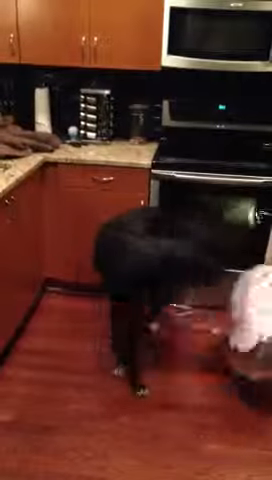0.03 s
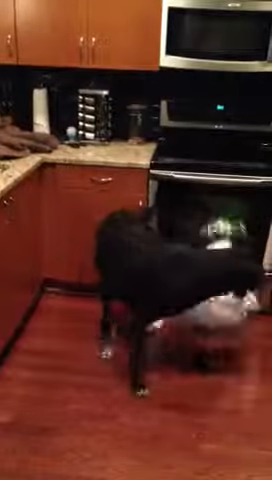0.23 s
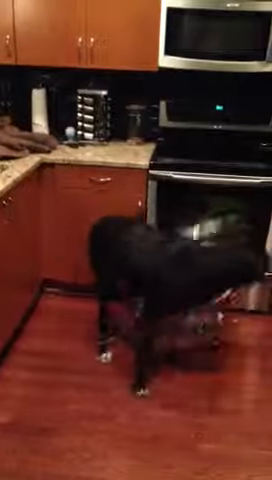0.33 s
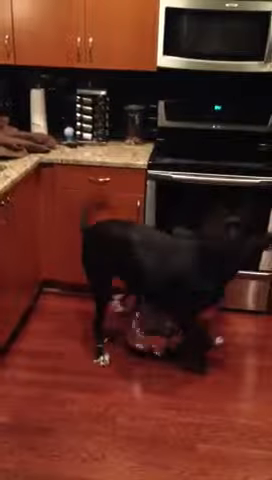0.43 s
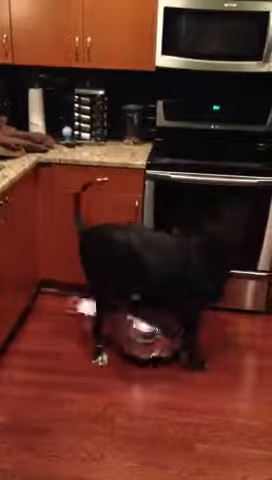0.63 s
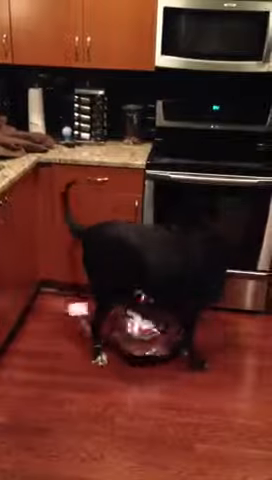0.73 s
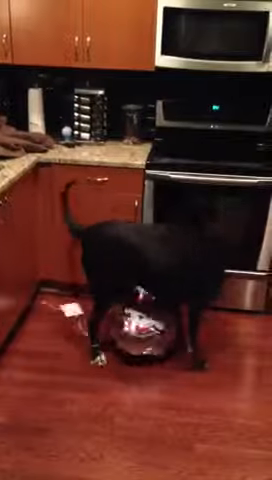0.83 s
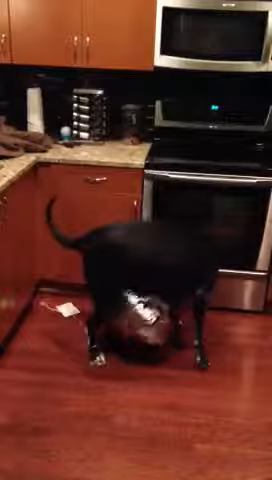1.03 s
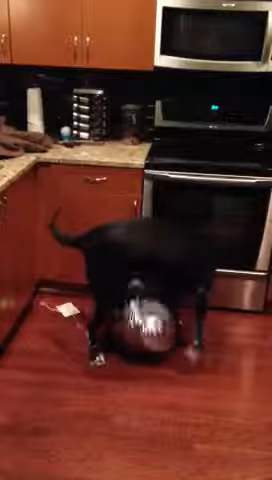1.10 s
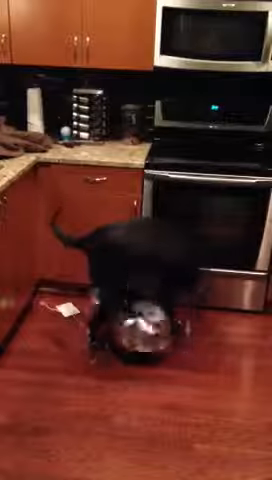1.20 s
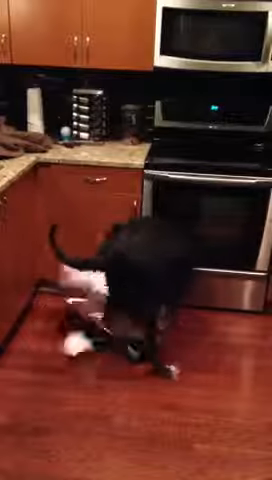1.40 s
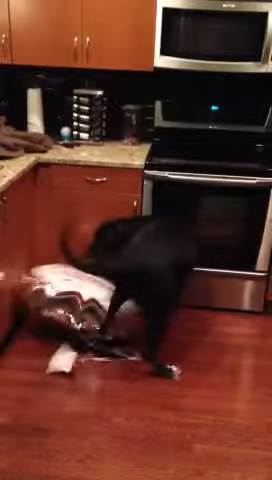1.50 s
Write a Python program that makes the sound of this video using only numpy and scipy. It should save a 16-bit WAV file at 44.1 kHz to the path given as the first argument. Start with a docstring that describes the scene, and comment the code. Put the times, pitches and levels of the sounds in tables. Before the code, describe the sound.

Foil balloon crackling and thumping as a dog pounces on it, paws thudding on wood.

```python
"""Foil crackle and hollow thumps: a large dog pounces on an inflated foil balloon on a wooden kitchen floor.
Each shove buckles the foil in a burst of tiny snaps that also drum on the gas inside.
Paws thud, claws tick, and something small and hard, probably the weight on the ribbon, knocks twice.
A few brief squeaks come in between; the bare room rings on over a steady hush."""
import sys
import numpy as np
from scipy import signal
from scipy.fft import rfft, irfft
from scipy.io import wavfile
from scipy.ndimage import uniform_filter1d

SR = 44100
rng = np.random.default_rng(int(sys.argv[2]) if len(sys.argv) > 2 else 0)


def digitize_waveform(pressure):
    """Quantize a signal to 16-bit integers and store it at the path in sys.argv[1].

    Rows of a 2-D input are taken as channels; values are limited to [-1, 1].
    """
    field = np.atleast_2d(pressure).T
    bounded = np.clip(field, -1, 1)
    quanta = np.round(bounded * 32767).astype(np.int16)
    wavfile.write(sys.argv[1], SR, quanta)


N = 68355
T = np.arange(N) / SR
AGE = T[:SR // 2]   # time since an onset [s]


def balloon():
    """Buckling foil rustles, crackles and drums on the hollow gas and the papery skin."""
    # (time [s], rise [s], t60 [s], gas [dB], skin [dB], rustle [dB], crackle [dB])
    shoves = [(0.0, 0.0079, 0.32, -62.5, -58, -53.5, -49.5),
              (0.062, 0.0041, 0.0729, -60.5, -60, -49.5, -44),
              (0.135, 0.0087, 0.48, -48.5, -51.5, -47.5, -50), (0.154, .015, 0.49, -41, -43, -47, -53),
              (0.226, 0.003, 0.19, -34, -38, -43.5, -51.5),
              (0.238, 0.00483, 0.2047, -26.5, -29, -26.5, -44.5),
              (0.28, 0.0304, 0.4736, -28.5, -34, -32, -38), (0.343, 0.006, 0.3063, -25, -26.5, -25.5, -31),
              (0.407, 0.00417, 0.1043, -20.5, -28, -28.5, -34.5),
              (0.515, 0.0043, 0.2964, -47, -45, -45, -47.5), (0.705, .004, 0.214, -45.5, -47.5, -49, -48.5),
              (0.718, 0.0185, 0.19, -38, -40, -42, -46), (0.759, 0.0117, 0.2126, -34, -40.5, -38, -39.5),
              (0.823, 0.0045, 0.2352, -56, -51, -43, -45.5), (0.925, 0.015, 0.15, -63.5, -60, -52.5, -51),
              (0.962, 0.0124, 0.3272, -47, -49, -47.5, -53), (1.032, 0.011, 0.0827, -45, -53.5, -57, -62),
              (1.082, 0.0039, 0.0044, -45.5, -49.5, -59, -71.5),
              (1.143, 0.0067, 0.6, -51.5, -57.5, -55.5, -51.5),
              (1.235, 0.0123, 0.2238, -41, -49.5, -54, -64.5),
              (1.286, 0.0159, 0.1655, -34.5, -45.5, -41.5, -36),
              (1.317, 0.00645, 0.1379, -29, -38.5, -29, -40.5),
              (1.33, 0.00453, 0.1308, -32, -40.5, -32.5, -33.5),
              (1.412, 0.0143, 0.3257, -42, -45, -44.5, -47), (1.474, 0.0165, 0.25, -43, -46, -43, -47)]
    # snap spectra: (frequency [Hz], level [dB])
    rustle_spectrum = [(100, -26), (300, -10.5), (700, -3), (1100, 2), (1500, 1.5), (2200, -0.5),
                       (3500, -5), (6000, -14.5), (10000, -26.5), (16000, -32)]
    crackle_spectrum = [(500, -24.5), (2000, -4.5), (4000, 4), (7000, -2.5), (10000, -7), (15000, -10.5)]
    # resonances: (frequency [Hz], width [Hz], level [dB])
    gas_modes = [(199.6, 35.4, -5), (240.04, 29, -3), (293.46, 45, 0), (359.34, 39.56, -2),
                 (439.3, 40.3, -7), (487.4, 39.5, -7.5)]
    skin_modes = [(566.9, 42.9, -0.5), (641.6, 42.2, -1), (693.3, 40.5, -1), (755, 49.8, -2),
                  (838.4, 38.6, -0.5), (932.2, 100.7, -7)]
    envelopes = sum(amp(db)[:, None] * burst(s, rise_s, t60_s) for s, rise_s, t60_s, *db in shoves)
    gas, skin, rustle, crackle = envelopes
    foil = through(rustle * creases(), snap(rustle_spectrum))
    foil += through(crackle * creases(), snap(crackle_spectrum))
    return foil + gas * drumming(gas_modes) + skin * drumming(skin_modes)


def creases(snaps_per_s=3500, spread_db=4.5):
    """Random tiny snaps of uneven size, at an even running level."""
    sizes = amp(spread_db * np.minimum(rng.exponential(1, N), 3.33))
    signs = rng.choice([-1, 1], N)
    hits = rng.random(N) < snaps_per_s / SR
    return evened(sizes * signs * hits, samples=700)


def drumming(modes):
    """A patter of snaps excites damped resonances, at an even level."""
    body = sum((-1) ** k * amp(db) * width_hz * np.exp(-np.pi * width_hz * AGE)
               * np.cos(2 * np.pi * hz * AGE) for k, (hz, width_hz, db) in enumerate(modes))
    body = butter(body + 1e-18, "high", hz=162)
    return evened(through(creases(), body), samples=500)


def foil_tones(relative_width=0.096):
    """Brief narrow tones from the foil: a high after-rattle, then two lower squeaks."""
    # (time [s], pitch [Hz], level [dB])
    tones = [(0.071, 2890, -45), (0.165, 998, -38), (0.187, 741, -40.5)]
    return sum(amp(db) * burst(s, rise_s=0.0091, t60_s=0.144) * drumming([(hz, relative_width * hz, 0)])
               for s, hz, db in tones)


def paws():
    """Soft pads set the floorboards ringing, at a pitch that varies with the spot."""
    # (time [s], relative level [dB], board pitch [ratio])
    landings = [(0.137, -39.5, 0.84), (0.249, -24.5, 1.21), (0.300, -29, 1.1), (0.411, -14.5, 1.05),
                (0.423, -18, 0.98), (0.440, -27, 0.72), (0.484, -33.5, .75), (0.761, -30, 1.0),
                (1.162, -41, 0.944), (1.223, -27, 0.99), (1.248, -32, 0.976), (1.318, -24, 0.911),
                (1.345, -28.5, 0.997), (1.431, -33.5, 1.083)]
    # (frequency at ratio 1 [Hz], level [dB], t60 [s])
    board_modes = [(152.7, -12, 0.088), (201, -4, 0.078), (241.3, -0.5, 0.0876), (295, 1.5, 0.0682),
                   (357.4, -8.5, 0.054)]
    thuds = sum(amp(db) * ring(np.multiply(board_modes, [pitch, 1, 1]), s) for s, db, pitch in landings)
    thuds = butter(thuds / 2, "high", hz=153.2, order=4)
    return butter(thuds, "low", hz=602)


def ticks():
    """Claws and single creases click, each with a brief chatter behind it."""
    # (time [s], level [dB], upper edge [Hz])
    clicks = [(0.0613, -8, 14900), (0.2925, -20, 9040), (0.3565, -7.5, 12000), (0.776, -8, 6530),
              (1.195, -17, 14000), (1.203, -18, 14000), (1.3385, -16, 12000)]
    # (frequency [Hz], level [dB])
    click_spectrum = [(500, -45.5), (2500, -17.5), (4200, 2.5), (8000, 0), (11000, -7), (15000, -9.5)]
    out = 0
    for s, db, top_hz in clicks:
        click = amp(-25) * burst(s, rise_s=0, t60_s=0.019) * creases()
        click[int(s * SR)] += 1
        out += amp(db) * butter(click, "low", hz=top_hz)
    return through(out, snap(click_spectrum))


def knocks_and_squeak(rise_s=0.002, clatter_t60_s=0.0775):
    """Short knocks and a brief squeak, each ringing near 1850 Hz."""
    # (time [s], clatter [dB], ring [dB], ring t60 [s])
    onsets = [(0.598, -25.5, -28.5, 0.0853), (0.620, -37.5, -35.5, 0.08), (0.768, -29.5, -23.5, 0.0839),
              (0.789, -37.5, -32, 0.0513), (1.323, -33, -31, 0.06)]
    # (frequency [Hz], level [dB], t60 [s])
    ring_modes = [(1495, -16.5, 0.068), (1841, -1, 0.075), (1920.8, -6.5, 0.078), (2489, -15.5, .06),
                  (2606, -12, .07), (3406, -15.5, 0.084)]
    # (frequency [Hz], level [dB])
    clatter_spectrum = [(200, -21.5), (600, -2), (1000, -4), (1900, 2), (2700, -1), (5000, -9.5),
                        (8000, -17.5), (15000, -35.5)]
    clatter_envelope = sum(amp(db) * burst(s, rise_s, clatter_t60_s) for s, db, _, _ in onsets)
    ring_envelope = sum(amp(db) * burst(s, rise_s, t60_s) for s, _, db, t60_s in onsets)
    tone = butter(through(creases(), ring(ring_modes, 0)), "high", hz=884)
    clatter = through(clatter_envelope * creases(), snap(clatter_spectrum))
    return clatter + ring_envelope * evened(tone, samples=250)


def treads():
    """The floor shudders faintly under the dog's weight."""
    # (time [s], level [dB])
    steps = [(0.235, -58.5), (0.286, -39.5), (0.345, -50.5), (0.412, -50.5), (0.48, -53), (0.715, -65.5),
             (0.76, -53.5), (0.835, -58), (0.99, -72.5), (1.17, -66.5), (1.312, -53.5), (1.439, -64)]
    # (frequency [Hz], level [dB])
    shudder_spectrum = [(20, -16), (35, -11.5), (65, -10), (110, 7.5), (150, -1), (300, -26), (1000, -62.5)]
    load = sum(amp(db) * burst(s, rise_s=0.021, t60_s=0.177) for s, db in steps)
    shudder = through(rng.standard_normal(N), snap(shudder_spectrum))
    return load * evened(shudder, samples=1500)


def kitchen(x, spots=4, spot_s=0.009):
    """Reverb of a moving source: it crossfades round several spots, each with its own echoes."""
    distances = [np.abs((T / spot_s - k) % spots - spots / 2) for k in range(spots)]
    fades = np.cos(np.pi / 2 * np.minimum(distances, 1))
    return sum(through(x * fade, response) for fade, response in zip(fades, echoes(spots)))


def echoes(spots, delay_s=0.002022, level_db=-2.5):
    """Quick reflections off floor and cabinets, then a diffuse tail; one response per spot."""
    # (frequency [Hz], t60 [s])
    room_decay = [(150, 0.435), (500, 0.455), (2000, 0.455), (6000, 0.579), (15000, 0.197)]
    edges_hz = np.geomspace(110, 17000, 11)
    size, out = len(AGE), 0
    early = unit(burst(delay_s, rise_s=0.000534, t60_s=0.115))
    for low, high in zip(edges_hz, edges_hz[1:]):
        noise = rng.standard_normal((spots, size + 2000))
        band = butter(noise, "band", hz=[low, high])[:, -size:]
        band = evened(band, samples=int(2 * SR / (high - low))) * np.sqrt(2 * (high - low) / SR)
        late = unit(burst(delay_s, rise_s=0.008, t60_s=at_hz(room_decay, np.sqrt(low * high))))
        out += amp(level_db) * band * np.hypot(late, early)[:size]
    return out


def hush(level_db=-48.5):
    """Steady, dull background noise."""
    # (frequency [Hz], level [dB])
    hush_spectrum = [(25, -24.5), (70, -26.5), (130, -1), (250, 2), (600, 1), (1500, -2), (5000, -8),
                     (10000, -14.5), (15000, -20.5)]
    return amp(level_db) * through(rng.standard_normal(N), snap(hush_spectrum))


def snap(spectrum, size=4096):
    """Minimum-phase click with this spectrum, at unit energy."""
    hz = np.arange(size // 2 + 1) * SR / size
    cepstrum = irfft(np.log(amp(at_hz(spectrum, hz))))
    cepstrum[size // 2:] = 0
    return unit(irfft(np.exp(2 * rfft(cepstrum)))[:size // 2])


def ring(modes, start_s):
    """Decaying sines set off by one blow."""
    tone = sum(amp(db - 60 * AGE / t60_s) * np.sin(2 * np.pi * hz * AGE) for hz, db, t60_s in modes)
    return np.pad(tone, (int(start_s * SR), N))[:N]


def burst(start_s, rise_s, t60_s):
    """Envelope: linear rise, exponential fade."""
    rise = np.minimum(AGE / max(rise_s, 1e-4), 1)
    fade = amp(-60 * np.maximum(AGE - rise_s, 0) / t60_s)
    return np.pad(rise * fade, (int(start_s * SR), N))[:N]


def evened(x, samples):
    """Hold the running RMS at one."""
    return x / np.sqrt(np.abs(uniform_filter1d(x ** 2, samples)) + 1e-12)


def amp(db):
    """Decibels to gain."""
    return 10 ** (np.asarray(db) / 20)


def unit(x):
    """Scale to unit energy."""
    return x / np.sqrt(np.sum(x ** 2) + 1e-20)


def through(x, response):
    """Convolve with an impulse response."""
    return signal.fftconvolve(x, response)[:N]


def butter(x, kind, hz, order=2):
    """Butterworth filter."""
    return signal.sosfilt(signal.butter(order, hz, kind, fs=SR, output="sos"), x)


def at_hz(points, hz):
    """Interpolate a table over log frequency."""
    knots_hz, values = np.transpose(points)
    return np.interp(np.log(np.maximum(hz, 1)), np.log(knots_hz), values)


def scene():
    """Dog and balloon in the kitchen, over the hush; mono."""
    direct = balloon() + foil_tones() + paws() + ticks() + knocks_and_squeak()
    background = hush()
    action = direct + kitchen(direct) + treads()
    return (amp(-1.5) * action + background)[None]


def record(dry, cutoff_hz=15400):
    """Steep low-pass."""
    return signal.sosfilt(signal.ellip(12, .2, 80, cutoff_hz, fs=SR, output="sos"), dry)


dry = scene()
out = record(dry)
digitize_waveform(out)
```